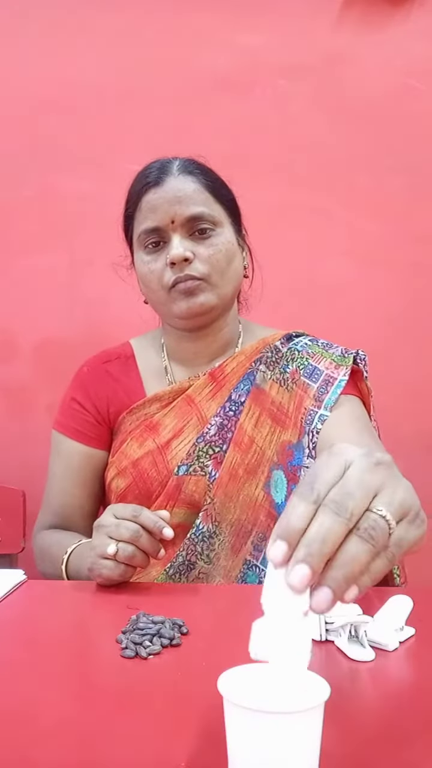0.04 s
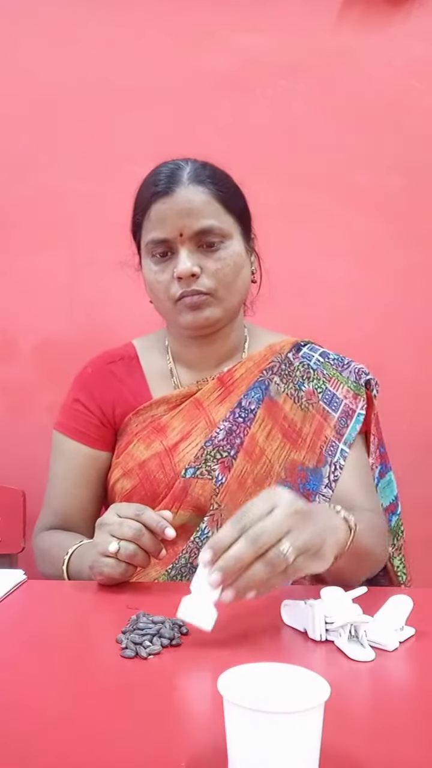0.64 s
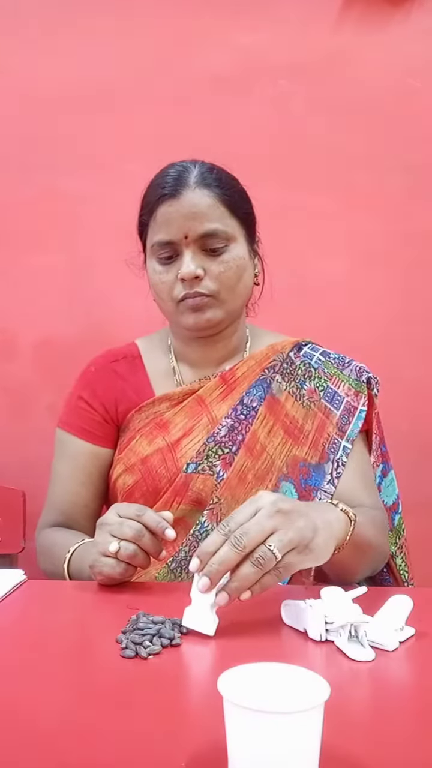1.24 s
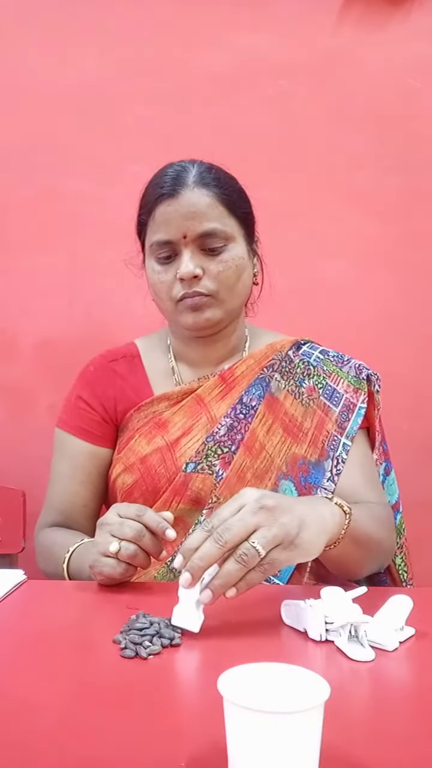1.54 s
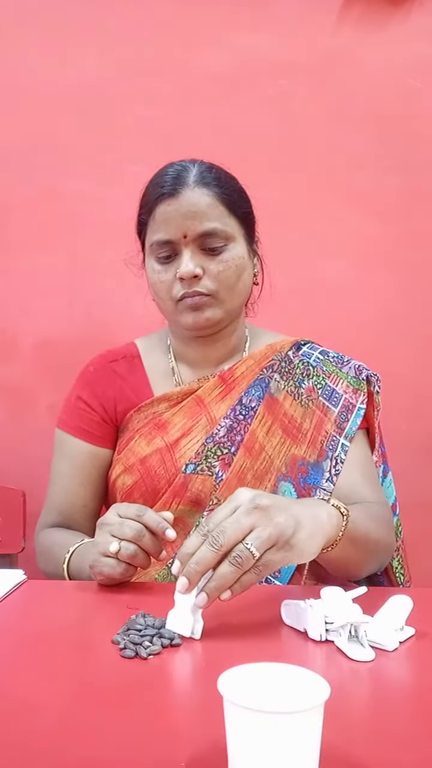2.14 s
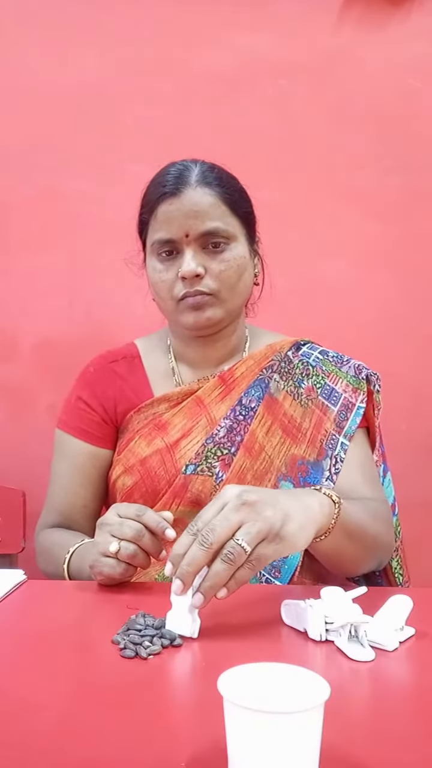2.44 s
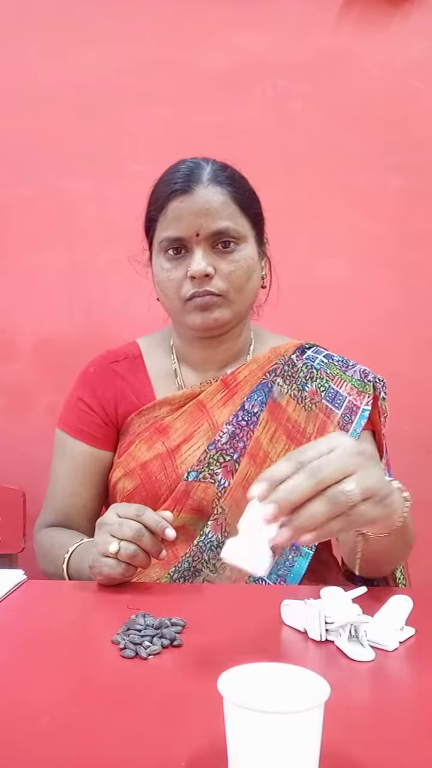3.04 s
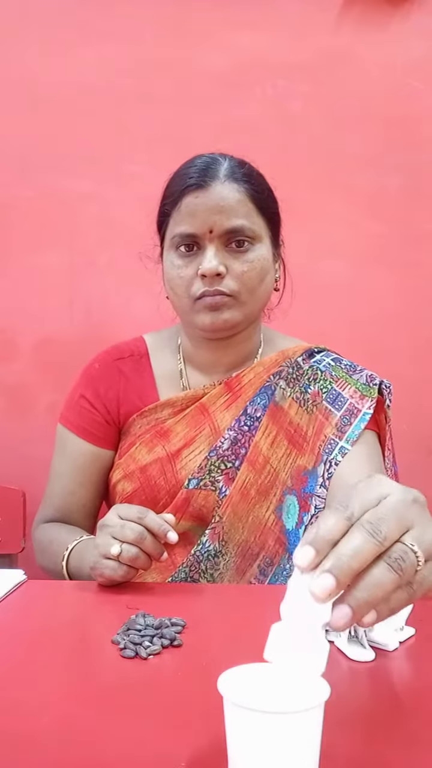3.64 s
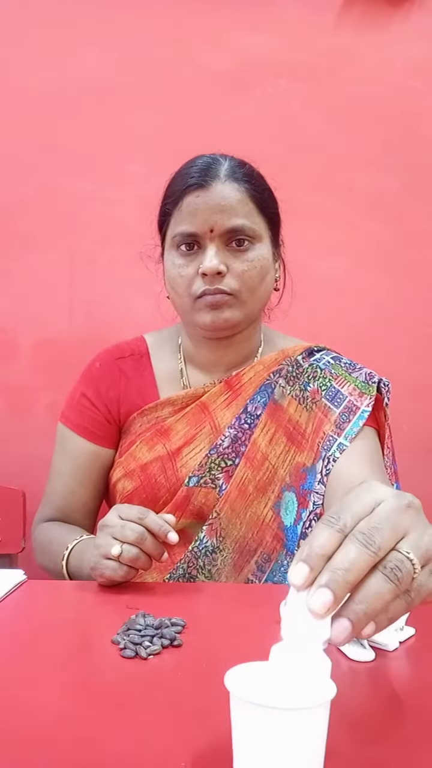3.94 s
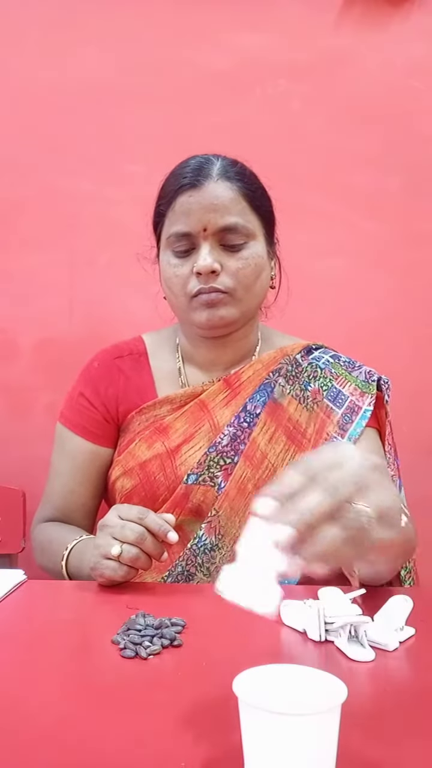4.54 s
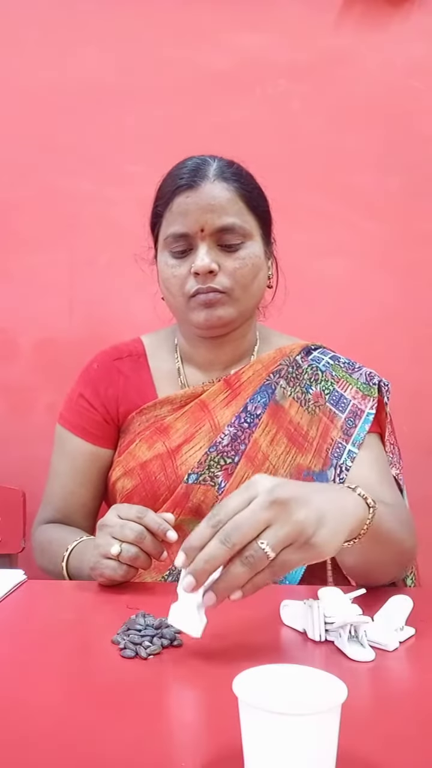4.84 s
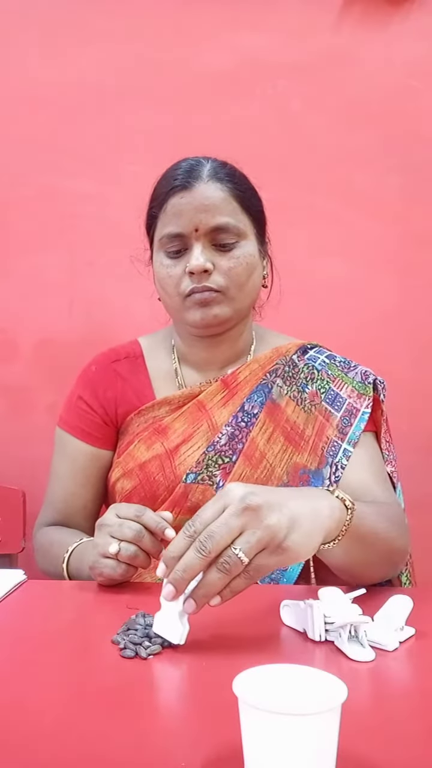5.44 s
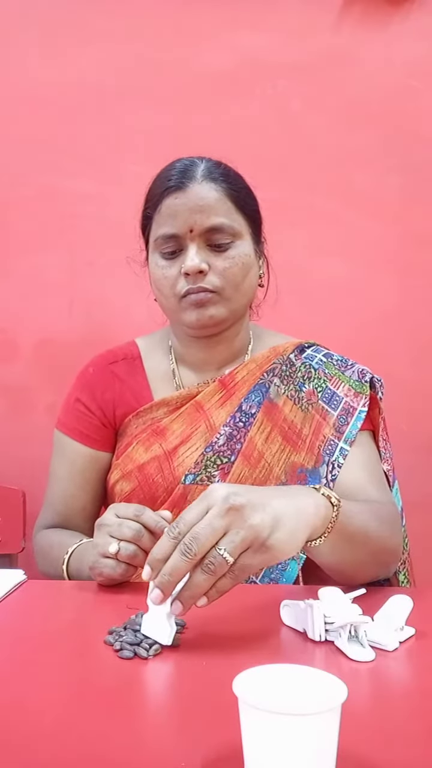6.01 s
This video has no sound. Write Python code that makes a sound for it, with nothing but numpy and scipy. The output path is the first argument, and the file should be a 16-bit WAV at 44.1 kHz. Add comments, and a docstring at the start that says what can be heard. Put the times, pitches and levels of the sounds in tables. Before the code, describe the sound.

A plastic clip snaps sharply, then clicks and scrapes through seeds on a table and taps a paper cup in a quiet room.

```python
"""A plastic spring clip is snapped, pushed through a heap of seeds on a table and opened over a paper cup.
Impacts excite the damped modes of jaws, hulls, table top and cup: clicks, ticks, thumps and hollow taps.
Stick-slip friction makes the seeds scrape, the hinge hiss and a sleeve rustle. A bare room reverberates
around these close, almost mono sounds, and a bird sings faintly outside."""
import sys
import numpy as np
from scipy import signal
from scipy.fft import rfft, irfft
from scipy.io import wavfile
from scipy.ndimage import uniform_filter1d

SR = 44100
rng = np.random.default_rng(int(sys.argv[2]) if len(sys.argv) > 2 else 0)


def pcm_store(signal):
    """Save signal as 16-bit PCM."""
    levels = np.round(np.clip(np.atleast_2d(signal), -1, 1) * 32767)
    wavfile.write(sys.argv[1], SR, levels.astype(np.int16).T)


N = 276507
TIME = np.arange(N) / SR


def undb(db):
    """Decibels to amplitude ratio."""
    return 10 ** (np.asarray(db) / 20)


def unit(x):
    """Normalisation to rms 1."""
    return x / np.sqrt(np.mean(x ** 2))


def decay(t, t60):
    """Exponential damping: 60 dB in t60 seconds."""
    return np.exp(-np.log(1000) * t / t60)


def along(hz, points):
    """Interpolation of (Hz, value) points on a log-frequency axis."""
    f, value = np.transpose(points)
    return np.interp(np.log(hz + 1), np.log(f), value)


def colour(x, points):
    """Minimum-phase filtering through (Hz, dB) points, by folding the cepstrum."""
    size = 4096
    cepstrum = irfft(np.log(undb(along(np.fft.rfftfreq(size, 1 / SR), points))))
    cepstrum[1:size // 2] *= 2
    cepstrum[size // 2 + 1:] = 0
    return signal.fftconvolve(x, irfft(np.exp(rfft(cepstrum))))[:len(x)]


def add(track, start, x):
    """Superposition of x on the track from start seconds."""
    i = max(int(start * SR), 0)
    track[i:i + len(x)] += x[:N - i]


def walk(rate):
    """Smooth random modulation with a spread near 1."""
    step = int(SR / rate)
    stairs = np.repeat(rng.standard_normal(N // step + 1), step)
    return 1.5 * uniform_filter1d(uniform_filter1d(stairs, step), step)[:N]


def swell(start, hold, attack, release):
    """Exponential envelope, full at start; attack and release are the seconds taken by 20 dB."""
    early, late = np.maximum(start - TIME, 0), np.maximum(TIME - start - hold, 0)
    return undb(-20 * np.minimum(early / attack + late / release, 10))


def grains(rate, spread_db):
    """Poisson process of tiny slips, a few much larger than the rest."""
    size = undb(spread_db * np.minimum(rng.exponential(size=N), 4))
    return (rng.random(N) < rate / SR) * size * rng.standard_normal(N)


def strike(modes, crack_db, crack_s, span_s, scatter_db=2, detune=.012):
    """Impact: modes that vary with the contact spot, plus a noise crack; rms 1 over the first span_s."""
    t = TIME[:SR // 3]
    hz, db, t60 = np.transpose(modes)[:, :, None]
    chance = rng.standard_normal((len(modes), 2, 1))
    sign = (-1) ** np.arange(len(modes))[:, None]
    gain = sign * undb(db + scatter_db * chance[:, 0])
    detuned_hz = hz * (1 + detune * chance[:, 1])
    ring = np.sum(gain * np.sin(2 * np.pi * detuned_hz * t) * decay(t, t60), axis=0)
    low, high = hz[0, 0], hz[-1, 0]
    spectrum = [(low / 4, -36), (low / 2, -17), *(m[:2] for m in modes), (high * 2, -26), (high * 5, -52)]
    crack = colour(rng.standard_normal(len(t)) * np.exp(-t / crack_s), spectrum)
    blow = ring + undb(crack_db) * crack
    return blow / np.sqrt(np.mean(blow[:int(span_s * SR)] ** 2))


def damped_ring(slips, modes, tone, t60_share=0.98):
    """Forced vibration: slips drive a body's modes, which the pressing hand damps slightly."""
    t = TIME[:SR // 2]
    ring = sum(undb(db) * decay(t, t60 * t60_share) * np.sin(2 * np.pi * hz * t) for hz, db, t60 in modes)
    return unit(colour(signal.fftconvolve(slips, ring)[:N], tone))


def hoarse_tone(length, first_hz, middle_hz, last_hz, db, hoarse):
    """Line broadening: random amplitude and phase flutter widen a tone on a parabolic glide."""
    progress = np.linspace(0, 1, int(length * SR))
    hz = np.polyval(np.polyfit([0, .5, 1], [first_hz, middle_hz, last_hz], 2), progress)
    lowpass = signal.butter(2, hoarse * middle_hz, fs=SR, output="sos")
    flutter = unit(signal.sosfilt(lowpass, rng.standard_normal((2, SR))))[:, -len(hz):]
    phase = 2 * np.pi * np.cumsum(hz) / SR
    tone = flutter[0] * np.sin(phase) + flutter[1] * np.cos(phase)
    return undb(db) * tone * signal.windows.tukey(len(hz), .3)


# The room at rest. Each row: frequency in Hz, relative spectral density in dB.
AIR_SPECTRUM = [(30, -19), (117, 3), (182, 0), (420, -11), (1110, -20), (1550, -22.5), (2360, -21),
                (7860, -37), (15500, -35.5)]
# Narrow peaks that colour the background murmur, probably from the microphone.
# Each row: centre in Hz, width in Hz, level in dB.
MURMUR_COLOUR = [(530, 45, -79), (895, 90, -78.5), (1070, 82, -83.5), (1270, 31, -75.5), (1740, 55, -80.5),
                 (2130, 110, -83), (2427, 60, -87.5)]

def air(level_db=-65, wander_db=3):
    """Ambient noise: a murmur wavers under steady hiss, and each narrow peak comes and goes on its own."""
    hz = np.fft.rfftfreq(N, 1 / SR)
    noise = unit(irfft(rfft(rng.standard_normal(N)) * undb(along(hz, AIR_SPECTRUM)), N))
    murmur = irfft(rfft(noise) / (1 + (hz / 2500) ** 4), N)
    out = undb(level_db) * (noise + murmur * (undb(1.5 * walk(9)) - 1))
    for centre_hz, width_hz, db in MURMUR_COLOUR:
        band = signal.lfilter(*signal.iirpeak(centre_hz, centre_hz / width_hz, SR), rng.standard_normal(N))
        out += undb(db) * unit(band * undb(wander_db * walk(6.8)))
    return out


# The room's echo. Each row: band centre in Hz, gain in dB, T60 in seconds.
ECHO_BANDS = [(101.8, -19.5, 0.68), (405, -6.5, 0.5), (1320, -7, 0.51), (2000, -16, 1.2), (2920, -17, 0.16),
              (4100, -6, 0.56), (5640, -13.5, 0.68), (7000, -11, 0.1), (11000, -10, 0.36)]
# Narrow peaks and dips that colour the echo, probably from the microphone.
# Each row: centre in Hz, width in Hz, gain in dB.
ECHO_COLOUR = [(864, 87, 7), (1340, 98, 4.5), (1590, 96, -5.5), (2120, 220, 4.5), (3080, 260, 4),
               (4800, 270, -4), (5598, 1200, 3.5), (7950, 500, -7.5)]

def room(x, first_wall_s=0.0062):
    """Reverberation: reflections off bare walls merge into a tail with its own decay in each band."""
    t, hz = TIME[:2 * SR], np.fft.rfftfreq(2 * SR, 1 / SR)
    peaks_db = sum(db / (1 + (2 * (hz - centre) / width) ** 2) for centre, width, db in ECHO_COLOUR)
    spectrum = rfft(rng.standard_normal(2 * SR)) * undb(peaks_db)
    tail = np.zeros(len(t))
    for centre, db, t60 in ECHO_BANDS:
        weight = along(hz, [(row[0], row[0] == centre) for row in ECHO_BANDS])
        fade = decay(t, t60) * np.minimum(t / first_wall_s, 1) ** 2
        tail += undb(db) * irfft(spectrum * weight) * fade / np.linalg.norm(fade)
    return signal.fftconvolve(x, tail)[:N]


# Whistles. Each row: start and length in seconds, middle pitch and glide in Hz, relative level in dB.
WHISTLES = [(1.294, 0.055, 3110, 408.5, -66), (1.666, 0.039, 2534, -100, -55),
            (1.91, 0.078, 2225, 251.5, -58), (1.978, 0.07, 2810, -100, -64.5), (2.255, 0.07, 2330, 43, -53),
            (2.809, 0.19, 3200, -82.5, -68.5), (3.845, 0.083, 2570, 300, -60),
            (4.2, 0.21, 2000, -180, -58.5), (4.623, .1, 2786, 238, -68), (4.786, 0.13, 2240, -200, -64),
            (4.933, 0.092, 2430, 593.5, -57.5), (5.25, 0.13, 2320, 553, -58.5),
            (5.469, 0.059, 3250, 75, -63), (5.732, 0.073, 2933, 308.5, -56)]

def bird(arch=0.044, t60=0.64, echo_db=1, direct_db=-7):
    """Direct and diffuse sound: far, arched whistles come through a window, followed by their echo."""
    song = np.zeros(N)
    for start, length, hz, glide_hz, db in WHISTLES:
        ends_hz = hz * (1 - arch)
        arc = length, ends_hz - glide_hz / 2, hz, ends_hz + glide_hz / 2
        core = hoarse_tone(*arc, db - 2, hoarse=.032)
        fringe = hoarse_tone(*arc, db - 4.5, hoarse=.11)
        add(song, start, core + fringe)
    tail = rng.standard_normal(SR) * decay(TIME[:SR], t60)
    echo = signal.fftconvolve(song, tail / np.linalg.norm(tail))[:N]
    return undb(direct_db) * song + undb(echo_db) * echo


def forearms(level_db=-69, lump_db=4):
    """Amplitude-modulated noise: forearms shifting on the table make a low, lumpy murmur."""
    spectrum = [(70, -23), (105, -18), (140, 3.5), (195, -6.5), (260, -22.5), (1000, -60.5)]
    murmur = colour(rng.standard_normal(N), spectrum)
    return undb(level_db) * unit(murmur * undb(lump_db * walk(33)))


# Rubbed cloth. Each row: frequency in Hz, gain in dB.
CLOTH_SPECTRUM = [(100, 2), (300, 1.5), (470, 2), (860, -7), (1280, -0.5), (1520, -11.5), (1900, -7.5),
                  (9000, -38)]
# Reaches of the arm. Each row: time of fastest motion and length in seconds, level in dB.
ARM_REACHES = [(1.08, 0.37, -60.5), (1.91, 0.32, -67), (3.417, 0.44, -65), (4.149, 0.66, -68.5),
               (5.409, 0.48, -64), (6.09, 0.27, -60.5)]

def sleeve():
    """Friction noise: cloth brushes unevenly, swelling and fading with each reach."""
    brush = colour(grains(rate=2500, spread_db=2.5), CLOTH_SPECTRUM) * undb(2.5 * walk(22))
    motion = sum(undb(db) * np.exp(-(2 * (TIME - peak) / length) ** 2) for peak, length, db in ARM_REACHES)
    return unit(brush) * motion


# A rub over the cup. In order: start and length in seconds, first, middle and last pitch in Hz, gain in dB.
FALLING_RUB = (3.94, .33, 490, 430, 400, -62)

def hollow_rub():
    out = np.zeros(N)
    start, *glide = FALLING_RUB
    add(out, start, hoarse_tone(*glide, hoarse=.11))
    return out


# The cup's modes. Each row: frequency in Hz, relative level in dB, T60 in seconds.
HOLLOW_MODES = [(171, -5.5, 0.038), (340, -6.5, 0.025), (348, 4.5, 0.055), (508, -2, 0.043),
                (850, -7.5, 0.08), (1190, -13, 0.022), (1700, -16.5, 0.017)]
# Hollow taps. Each row: start in seconds, relative level in dB, gain of the upper modes in dB.
HOLLOW_TAPS = [(3.4269, -52.5, 1.5), (3.4600, -56.5, -3), (3.4915, -49, 5), (4.0087, -60.5, 5.5),
               (5.044, -51, -8)]

def hollow_taps():
    """Heavily damped resonance: short, hollow notes, on the cup and, for the last, at the table."""
    out = np.zeros(N)
    for start, db, bright_db in HOLLOW_TAPS:
        tap = strike(HOLLOW_MODES, crack_db=14, crack_s=.02, span_s=.03)
        add(out, start, undb(db + 2) * colour(tap, [(420, 0), (800, bright_db)]))
    return out


# Rubbing on the cup. Each row: start in seconds, hold in seconds, level in dB.
PAPER_RUBS = [(3.443, 0.071, -50.5)]

def cup_rubs():
    """Frictional excitation: light slips keep the hollow note going between the taps."""
    rub = damped_ring(grains(rate=1500, spread_db=2), HOLLOW_MODES, [(70, -20), (150, 0), (900, -1)])
    return rub * sum(undb(db) * swell(start, hold, 0.026, 0.073) for start, hold, db in PAPER_RUBS)


# The table top's modes. Each row: frequency in Hz, relative level in dB, T60 in seconds.
TABLETOP_MODES = [(70.7, -9, 0.44), (128.8, 5.5, 0.27), (188.9, 0.5, 0.24), (339.4, -1.5, 0.21),
                  (401, -1, 0.037), (507.8, 1.5, 0.097), (610, -5, 0.18), (787, 10, 0.06),
                  (1070, 16.5, 0.028), (1294, 12.5, 0.015), (1696, 2, 0.14), (2070, 4.5, 0.13)]
TABLE_KNOCKS = [(0.8879, -52.5, -5, -9), (0.901, -52.5, 2, -27), (1.221, -67.5, 16, -6),
                (1.604, -51, 5.5, 1), (1.6296, -58.5, 16, 15.5), (2.103, -51.5, -4, -20),
                (2.1337, -41.5, -8.5, 5), (2.3816, -75, 30, 5.5), (5.372, -76.5, 34.5, -20),
                (5.832, -57, 7, -14), (5.866, -56, 15.5, 9.5)]

def table_knocks():
    """Contact stiffness sets the spectrum: soft blows thump the table, hard ones rap its upper modes."""
    out = np.zeros(N)
    for start, db, soft_db, deep_db in TABLE_KNOCKS:
        thump_db, rap_db = soft_db / 2, -13 - soft_db / 2
        tone = [(72, thump_db + deep_db), (120, thump_db + 5), (190, thump_db), (300, 0.028), (600, 0),
                (900, rap_db), (2200, rap_db), (4000, rap_db + 3)]
        ring = strike(TABLETOP_MODES, crack_db=19, crack_s=.006, span_s=.03)
        add(out, start, undb(db + 13) * colour(ring, tone))
    return out


# Scraping seeds. Each row: frequency in Hz, gain in dB.
SCRAPE_SPECTRUM = [(220, -4), (350, -16.5), (520, 1), (680, -3.5), (820, -2), (1280, 3.5), (1520, -11.5),
                   (1900, 5), (2500, -4), (4000, -19.5), (6500, -32), (15000, -55)]
# Pushes. Each row: peak time, rise and fall in seconds, relative scrape, rumble and grind levels in dB.
SEED_PUSHES = [(1.36, 0.13, 0.17, -57, -57.5, -88), (1.61, 0.12, 0.056, -44, -47, -49.5),
               (2.143, 0.038, 0.085, -41.5, -32.5, -45), (2.25, 0.086, 0.088, -45, -48, -68),
               (2.335, 0.04, 0.025, -49, -53.5, -56.5), (2.697, 0.059, 0.011, -49, -74, -49.5),
               (5.682, 0.072, 0.097, -54.5, -68, -53), (5.863, 0.13, 0.087, -46.5, -40.5, -39.5)]

def seed_shoves():
    """Stick-slip friction: seeds scrape and shake the table's low modes; coarser slips grind the rest."""
    slips, jerks = grains(rate=3500, spread_db=2), grains(rate=700, spread_db=2)
    rumble_tone = [(35, 1), (70, 7), (125, 2), (190, 6.5), (400, -15.5)]
    grind_tone = [(120, -19.5), (300, 6.5), (520, 16.5), (750, 6), (1000, -11.5), (1300, 8.5), (2500, -23)]
    scrape = undb(-3) * unit(colour(slips, [(90, -19)] + SCRAPE_SPECTRUM))
    rumble = undb(-0.5) * damped_ring(slips, TABLETOP_MODES[:3], rumble_tone)
    grind = undb(-3) * damped_ring(jerks, TABLETOP_MODES[3:], grind_tone)
    out = np.zeros(N)
    for peak, rise, fall, scrape_db, rumble_db, grind_db in SEED_PUSHES:
        push = swell(peak, 0, rise, fall)
        out += push * (undb(scrape_db) * scrape + undb(rumble_db) * rumble + undb(grind_db) * grind)
    return out


# A seed on the table. Each row: frequency in Hz, relative level in dB, T60 in seconds.
HULL_MODES = [(1220, 10.5, 0.18), (1987, 16.5, 0.028), (2520, 6.5, 0.33), (3200, 13, 0.042),
              (4500, -5, 0.0091), (5280, -5.5, 0.0013), (9500, -30, .006)]
# Nudged hulls. Each row: start in seconds, level in dB, slide time in seconds, ping over tick in dB.
HULL_TICKS = [(0.8878, -53, 0.01, 3.5), (1.0497, -43.5, 0.0065, -4.5), (1.067, -56, 0.0054, -2.5),
              (1.2218, -55.5, 0.0078, -9.5), (1.43, -54.5, 0.012, -18), (1.553, -51, 0.0057, -31),
              (1.665, -55.5, 0.028, -17), (1.865, -55, 0.0054, -31.5), (2.1005, -45, 0.0088, -10),
              (2.1104, -45, 0.018, -4.5), (2.168, -43.5, 0.02, -6.5), (2.682, -64, 0.021, 0.5)]

def seed_ticks(ping_hz=4280, ping_t60=0.007):
    """Contact time shapes an impact: dry hulls tick on the jaws and each other, softer when they slide."""
    out = np.zeros(N)
    for start, db, slide_s, ping_db in HULL_TICKS:
        tick = strike(HULL_MODES, crack_db=17, crack_s=slide_s, span_s=.0024)
        ping = strike([(ping_hz, 0, ping_t60)], crack_db=7, crack_s=slide_s, span_s=.0024, detune=.02)
        onset = np.minimum(TIME[:len(tick)] / (slide_s / 10), 1)
        add(out, start, undb(db) * onset * (tick + undb(ping_db) * ping))
    return out


# The rubbing hinge. Each row: frequency in Hz, gain in dB.
HINGE_SPECTRUM = [(900, -29), (1300, 23.5), (1650, -16), (2300, 16.5), (3200, -20), (4800, -1), (5700, 16),
                  (6800, -12), (9300, -7.5), (12000, -31), (15000, -8)]
HINGE_SQUEEZES = [(3.769, 0.059, -62.5), (3.964, 0.069, -65), (4.103, 0.097, -65.5)]

def hinge(attack_s=0.078, release_s=0.021):
    """Source and filter: fine friction in the squeezed hinge hisses through the plastic."""
    rub = unit(colour(grains(rate=2500, spread_db=2.5), [(300, -14)] + HINGE_SPECTRUM))
    squeeze = sum(undb(db) * swell(start, hold, attack_s, release_s) for start, hold, db in HINGE_SQUEEZES)
    return rub * squeeze


# Rattles after a snap. Each row: start in seconds, length in seconds, initial level in dB.
CLIP_RATTLES = [(0.046, 0.22, -33.5), (0.255, 0.224, -46), (3.417, 0.065, -55.5), (5.057, 0.033, -52)]

def clip_chatter(attack_s=0.0054, release_s=0.018, fade_db_per_s=39):
    """Repeated impacts: the loose halves chatter, too lightly to ring the plastic's highest modes."""
    spectrum = [(50, -39), (170, -14.5), (350, -22), (800, -12.5), (1270, -6.5), (1550, -6), (2050, 0),
                (2750, -8), (3050, -2.5), (3550, -9.5), (4400, -19.5), (5300, -14), (6600, -18.5),
                (8000, -26.5), (13000, -46)]
    rattle = unit(colour(grains(rate=1000, spread_db=2), spectrum))
    shake = np.zeros(N)
    for start, length, db in CLIP_RATTLES:
        fade_db = fade_db_per_s * np.maximum(TIME - start, 0)
        shake += undb(db - fade_db) * swell(start, length, attack_s, release_s)
    return rattle * shake


# The jaws' modes. Each row: frequency in Hz, relative level in dB, T60 in seconds.
PLASTIC_MODES = [(1301, -10, 0.022), (1930, 0, 0.014), (2136, -1.5, 0.042), (2450, -1, 0.013),
                 (3040, -3, .013), (4200, -19, 0.012), (5030, -14, 0.0065), (5834, -12.5, 0.0031),
                 (6860, -23, 0.0048), (8700, -25, 0.007), (10300, -29.5, .0037), (14700, -30, .006)]
# Limits in Hz of a click's five bands: body, main, bite, edge and top.
BAND_LIMITS_HZ = [900, 1600, 2600, 4400, 7000, 16000]
# Clicks. Each row: start in seconds, relative main-band level in dB, body, bite, edge and top in dB over it.
JAW_CLICKS = [(0.0298, -29, -3.5, -6, -7, -18.5), (0.0333, -15, -10.5, -5.5, -13, -25),
              (0.054, -50.5, 4, 17.5, 0, 7.5), (0.07, -37, 1, 2, -10, -13),
              (0.1441, -39, -5, -11, -10, -12), (0.172, -23.5, -8, -8, -16.5, -34),
              (0.2202, -23.0, -22.5, -10.5, -9.5, -35), (0.231, -32.5, -4, -16, -22, -27),
              (0.261, -28.5, -8.5, -18, -8.5, -20), (0.2815, -48, -13, 0, -2, -18),
              (0.3728, -47, 0, -5, -15, -24), (0.39, -49.0, 0, 5, -1.5, -41),
              (0.472, -50, 1.5, 4.5, 7.5, -5), (3.4222, -53.5, -3, -11.5, 2.5, -6.5),
              (3.71, -40.5, -5.5, -12, -17.5, -40), (4.1948, -43, 1, -22, -20, -33),
              (4.4587, -49.5, -6, 1, 4, -26), (5.0206, -50.5, -5, -9, -8.5, -30.5),
              (5.0434, -46.5, -5.5, 0.5, 5, -25), (5.0578, -59, -10, 1, 10.5, -15),
              (6.0603, -50.0, -11, -2.5, -10.5, -13), (6.07, -46, -15.5, -8.5, -10, -20)]

def clip_clicks(bounce_s=.0017, bounce_db=-6):
    """Modal ringing: sharp contacts ring the jaws, coloured by where they land; the table reflects them."""
    out, lag = np.zeros(N), int(bounce_s * SR)
    bands = list(zip(BAND_LIMITS_HZ, BAND_LIMITS_HZ[1:]))
    for start, db, body_db, bite_db, edge_db, top_db in JAW_CLICKS:
        ring = strike(PLASTIC_MODES, crack_db=11, crack_s=.0015, span_s=.008, detune=.025)
        ring = ring + undb(bounce_db) * np.pad(ring, (lag, 0))[:len(ring)]
        power, hz = np.abs(rfft(ring)) ** 2, np.fft.rfftfreq(len(ring), 1 / SR)
        tone = []  # gains that bring each band's share of the power to its level
        for (low, high), band_db in zip(bands, [body_db, 0, bite_db, edge_db, top_db]):
            share_db = 10 * np.log10(power[(hz > low) & (hz < high)].sum() / power.sum())
            tone += [(low * 1.1, band_db - share_db), (high / 1.1, band_db - share_db)]
        main_db = tone[2][1]
        bass = [(150, main_db - 8), (650, main_db + 1)]
        add(out, start, undb(db - 1.35) * colour(ring, bass + tone))
    return out


def scene():
    """Mid-side stereo: all sources are central; only a trace of echo and hiss differs between the ears."""
    contacts = clip_clicks() + clip_chatter() + seed_ticks() + table_knocks() + hollow_taps()
    near = contacts + seed_shoves() + cup_rubs() + hinge() + hollow_rub() + sleeve()
    mid = near + room(near) + forearms() + bird() + air()
    side = undb(-29) * room(near) + undb(-12.5) * air() + undb(-80) * rng.standard_normal(N)
    return np.array([mid + side, mid - side])


def record(dry):
    """Band limiting: the deepest bass and the very top are filtered out."""
    highpass = signal.butter(4, 50, "high", fs=SR, output="sos")
    lowpass = signal.ellip(8, .2, 70, 15800, fs=SR, output="sos")
    return signal.sosfilt(lowpass, signal.sosfilt(highpass, dry))


dry = scene()
out = record(dry)
pcm_store(out)
```